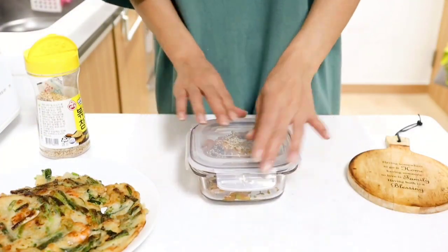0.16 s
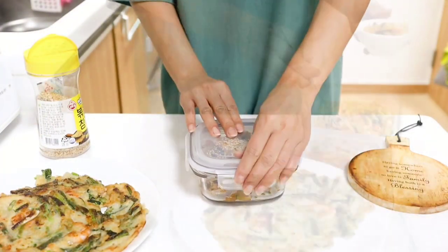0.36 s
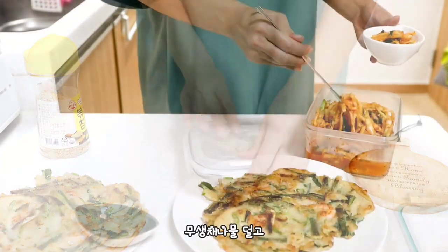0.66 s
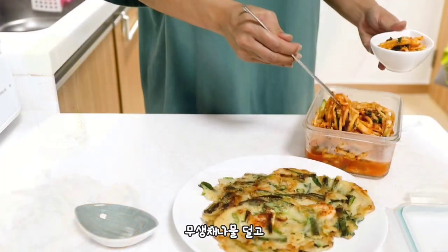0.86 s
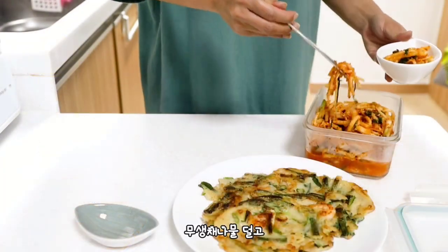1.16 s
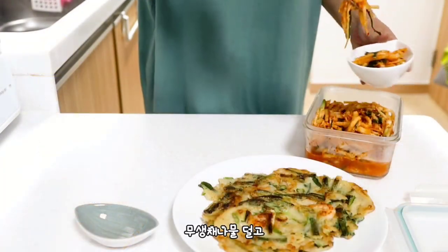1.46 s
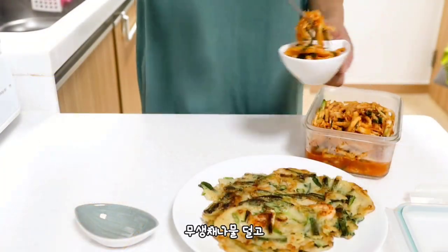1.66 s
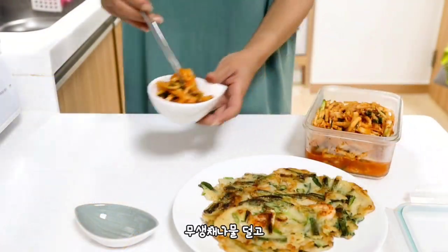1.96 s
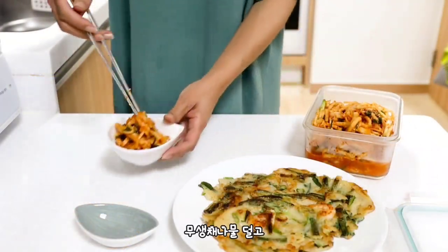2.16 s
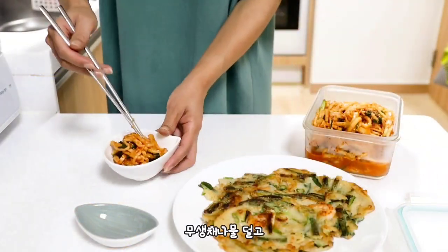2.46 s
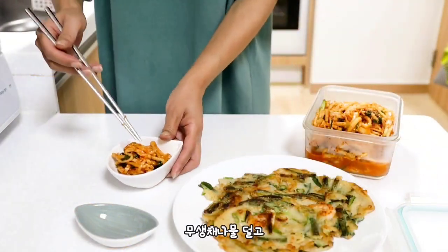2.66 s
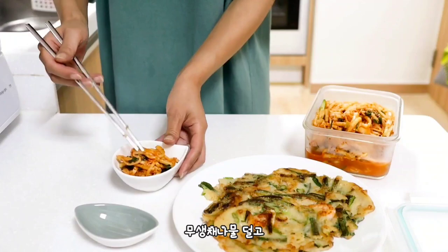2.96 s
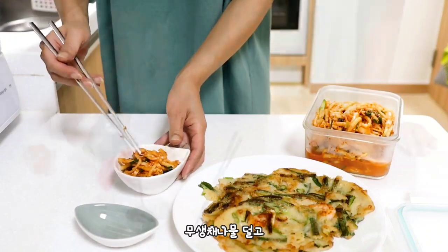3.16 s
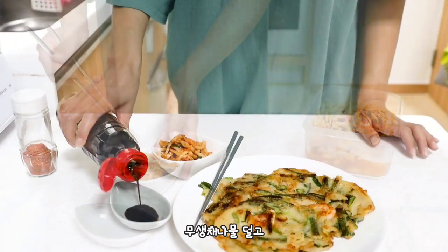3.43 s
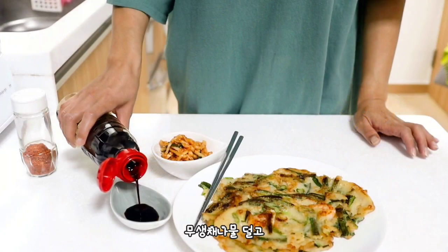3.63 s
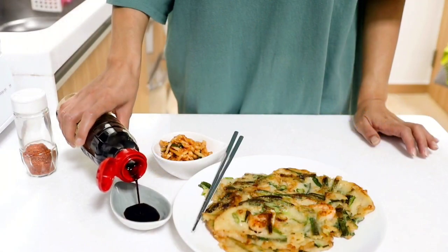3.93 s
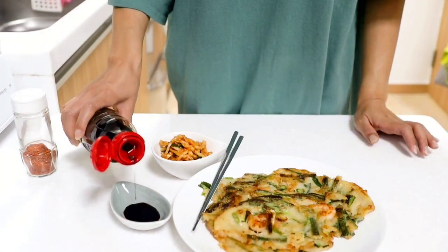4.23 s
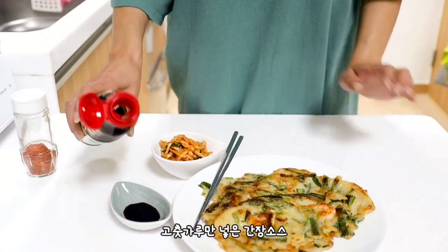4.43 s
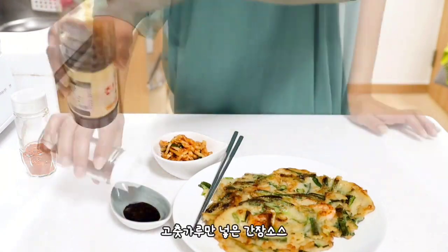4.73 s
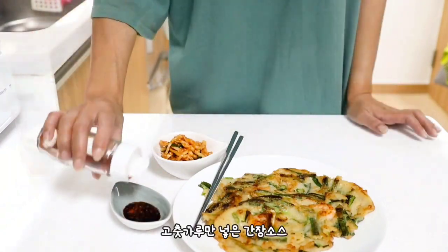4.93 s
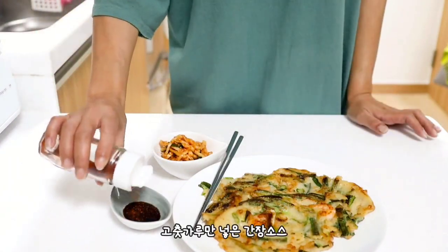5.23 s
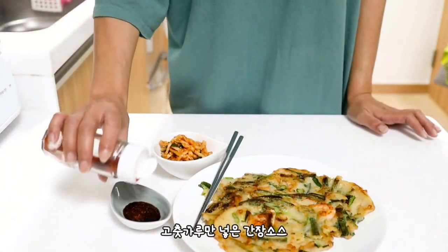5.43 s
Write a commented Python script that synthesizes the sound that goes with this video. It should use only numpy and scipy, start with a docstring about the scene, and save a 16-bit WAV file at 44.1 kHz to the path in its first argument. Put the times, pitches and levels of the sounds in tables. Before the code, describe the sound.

In a home kitchen with appliances droning steadily, hands press a plastic lid onto a glass box and two flaps click shut loudly. A couple of seconds later tableware is set down with one firm knock and several lighter ones, then small things tick and clink quietly. The microphone is close, and the hard walls give each blow a brief ring.

```python
"""Plastic lid and tableware in a kitchen

The flaps of a plastic lid snap shut on a glass box, then tableware knocks on the table and small
things tick. Each blow rings damped modes and hard walls answer it; appliances drone and hum behind.
The camera widens the treble in stereo and meets the loudest blows with clipping and a brief gain dip."""
import sys
import numpy as np
from scipy import signal
from scipy.fft import rfft, irfft, next_fast_len
from scipy.io import wavfile
from scipy.ndimage import uniform_filter1d, map_coordinates

SR = 44100
rng = np.random.default_rng(int(sys.argv[2]) if len(sys.argv) > 2 else 0)


def output_pcm(signal):
    """Save a mono or channel-first signal as 16-bit PCM at the path in sys.argv[1].

    Samples are clipped to [-1, 1] before scaling.
    """
    pcm = np.clip(np.atleast_2d(signal).T, -1, 1) * 32767
    wavfile.write(sys.argv[1], SR, np.round(pcm).astype(np.int16))


N = 246519
LEAD = SR // 10  # samples before time 0
HIT_TIME_S = np.arange(SR // 8) / SR

# Each row: frequency in Hz, t60 in seconds, level in dB for side flap, front flap, back flap, creak.
LID_MODES = [(300, 0.028, -22, -16, -26, -6), (560, 0.04, -20, -15, -26, -5),
             (800, 0.024, -10, -20, -9, -14), (900, 0.011, -33, -12, -13.5, -2.5),
             (1140, .014, -9, -22, -11, -7), (1400, 0.015, -21, -15, -13, -6.5),
             (1664, 0.0099, -4, -20, -5, -16), (1880, 0.011, 3, -24, 0, -8), (2420, 0.007, -5, -9, -1, -8),
             (2900, .005, -2, -9, -8, -16.5), (3205, 0.0055, -8, -6, -7, -12.5),
             (3830, .006, -10, 0, -14, -20), (4083, 0.007, -1, -9, 2, -20), (4850, .0045, -6, 5, -3, -25),
             (5200, 0.0055, 1.5, -16, 2, -28.5), (5600, .004, -8, 1, -14, -30),
             (6480, 0.004, -8, 1, 1, -33), (7200, .0034, -7, 6.5, -4, -33), (8900, 0.0046, 0, -14, 0, -35),
             (9800, .0035, -9.5, -22, -2, -33), (11100, .004, -12, -2, -10, -36),
             (12900, 0.0033, -12, -24, -4, -38.5), (14700, .003, -12, -2, -3, -40)]
SIDE_FLAP, FRONT_FLAP, BACK_FLAP, CREAK = 2, 3, 4, 5  # columns of LID_MODES
# Each row: start in seconds, level in dB, room in dB, extra room in the beamed band in dB.
FLAP_SNAPS = [(-.03, -1.5, -6.5, -.5), (0.4351, 0.4, -15, 5), (0.5129, 3, -10, -2)]
# Each row: start in seconds, level in dB, contact sharpness in Hz.
LID_CREAKS = [(0.3825, -26, 9000), (0.395, -22.5, 7000), (0.4235, -17, 5000), (.4262, -19, 3500),
              (0.4903, -18, 3000)]


def lid():
    """Each flap drives the lid's modes from its own place; creaks bend it and stir the low modes."""
    out = np.zeros((2, N + LEAD))
    shared = dict(echo_s=0.0137, echo_db=-21, thin_hz=350)
    for flap, (start, db, room_db, beam_db) in zip((SIDE_FLAP, FRONT_FLAP, BACK_FLAP), FLAP_SNAPS):
        snap = blow(LID_MODES, flap, sharp_hz=12000, room_db=room_db, crack_db=-10,
                    attack_s=0.00028, blur_octaves=0.11, beam_db=beam_db, **shared)
        add(out, start, amp(db) * snap)
    for start, db, sharp_hz in LID_CREAKS:
        creak = blow(LID_MODES, CREAK, sharp_hz, room_db=-5, crack_db=-22,
                     attack_s=0.0003, blur_octaves=0.2, **shared)
        add(out, start, amp(db) * creak)
    return out


# Each row: frequency in Hz, t60 in seconds, level in dB for a hard, a soft, a light knock.
WARE_MODES = [(103, 0.085, -22, -46, -40), (203, 0.045, -12, -20, -20), (260, 0.058, -15, -16, -13),
              (461, 0.025, -12, -11, -18), (588, 0.032, -16, -17, -8), (725, 0.034, -11, -3.5, -24),
              (755, .026, -18, -22, -1), (860, 0.026, -8, -10, -15), (965, 0.028, -6, -12, -20),
              (1125, 0.051, -7, -20, -20), (1310, 0.027, -12, -11, -8), (1580, 0.016, -3, -7, -13),
              (1810, 0.02, -4, -8, -12), (1950, 0.016, -2, -11, -11), (2170, 0.013, 6.5, -22, -2),
              (2200, .022, -24, -4, -24), (2600, 0.01, 2, -12, -14), (2710, .015, -22, -7, -20),
              (2860, 0.03, -19.5, -28, -24), (3120, .012, -9, -13, -12), (3330, 0.017, -15, -30, -18),
              (3570, .01, -17, -19, -24), (4300, 0.0061, -11, -34, -26), (4870, .02, -30, -30, -30)]
WARE_COLUMN = {"hard": 2, "soft": 3, "light": 4}  # kind of knock to its column of WARE_MODES
# Each kind: room in dB, crack in dB, attack in seconds, blur in octaves, extra beamed-band room in dB.
WARE_CONTACTS = {"hard": (-9.5, -46, 0.0004, .1, -1.5), "soft": (-7, -34, 0.0008, .08, -1),
                 "light": (-9, -34, .0007, .08, -1)}
# Each row: start in seconds, level in dB, contact sharpness in Hz, kind.
WARE_KNOCKS = [(2.6508, 4, 6500, "hard"), (2.683, -17, 2500, "soft"), (2.695, -11, 2500, "soft"),
               (2.7102, -12, 2500, "soft"), (3.064, -29, 3500, "soft"), (3.1163, -17, 1400, "soft"),
               (3.1210, -8.5, 5800, "soft"), (3.1238, -12, 5000, "soft"), (3.1265, -16, 4000, "soft"),
               (3.1315, -13, 2800, "soft"), (3.3423, -21, 1500, "light"), (3.3472, -24, 5000, "light"),
               (3.3485, -12, 4450, "light"), (3.3558, -20, 2500, "light")]


def tableware():
    """Dishes and table top ring together: one hard knock, then softer knocks and bounces."""
    out = np.zeros((2, N + LEAD))
    for start, db, sharp_hz, kind in WARE_KNOCKS:
        knock = blow(WARE_MODES, WARE_COLUMN[kind], sharp_hz, *WARE_CONTACTS[kind],
                     echo_s=0.017, echo_db=-28.5, thin_hz=40)
        add(out, start, amp(db) * knock)
    return out


def blow(modes, column, sharp_hz, room_db, crack_db, attack_s, blur_octaves, beam_db=0, *,
         echo_s, echo_db, thin_hz):
    """Modes ring under a short crack, heard directly, off the nearest wall and through the room."""
    t = HIT_TIME_S
    hz, t60, mode_db = np.array(modes).T[[0, 1, column], :, None]
    sign = (-1.0) ** np.arange(len(hz))[:, None]  # neighbouring modes start in opposite directions
    side_phase = rng.uniform(0, 2 * np.pi, hz.shape)
    mode_db = mode_db + rng.normal(0, 1.5, hz.shape)
    envelope = sign * amp(mode_db - 60 * t / t60) * (1 - np.exp(-t / attack_s))
    ring = np.array([(envelope * np.sin(2 * np.pi * hz * t + p)).sum(axis=0) for p in (0, side_phase)])
    crack = amp(crack_db - 60 * t / 0.016) * rng.standard_normal(ring.shape)
    # A small object loses the bass, a soft contact the treble.
    hit = filtered(ring + crack, lambda f: (1j * f / (thin_hz + 1j * f) / (1 + 1j * f / sharp_hz)) ** 2)
    beam_hz, beam_octaves = 1950, 0.3  # directional band: reaches walls and camera unequally
    beam = lambda f: amp(beam_db * np.exp(-0.5 * (np.log2((f + 1) / beam_hz) / beam_octaves) ** 2))
    radiated = all_round(filtered(hit, beam), blur_octaves)
    out = amp(room_db) * walls(radiated, fill_s=0.009)
    direct = widened(hit, DIRECT_WIDTH)
    out[:, :len(t)] += direct
    out[:, round(echo_s * SR):][:, :len(t)] += amp(echo_db) * direct
    return out


# Each row: start in seconds, level in dB, pitch in Hz, t60 in seconds.
PALM_THUMPS = [(.301, -21, 168, 0.042), (0.323, -18.5, 105, 0.043), (4.788, -28, 285, 0.088)]


def thumps():
    """Palms push softly on the table, ringing one low mode each time."""
    out, t = np.zeros((2, N + LEAD)), HIT_TIME_S
    for start, db, hz, t60 in PALM_THUMPS:
        push = amp(db - 60 * t / t60) * (1 - np.exp(-t / 0.0038)) * np.sin(2 * np.pi * hz * t)
        add(out, start, push * amp([[0], [-15]]))
    return out


# Each row: start in seconds, level in dB, centre in Hz, t60 in seconds, noise share from 0 to 1.
SMALL_TICKS = [(1.548, -44, 11500, 0.01, .8), (1.788, -32, 9800, .006, .5), (1.885, -42, 12500, .006, .8),
               (4.291, -38, 9900, 0.016, 0.6), (4.398, -33, 4800, 0.011, 0.75),
               (4.398, -36, 2900, .014, .6), (4.398, -39, 7000, .009, .7), (4.418, -42, 2600, .008, .8),
               (4.434, -42, 4200, .008, .5), (4.4345, -45, 7300, .01, .5), (4.398, -40, 10000, .01, .5),
               (4.425, -42, 4400, 0.016, .1), (4.4345, -36, 3100, 0.02, 0.2), (4.4365, -37, 2600, .03, .2),
               (4.6235, -27, 1890, 0.04, .25), (4.6245, -37, 2800, .02, .2),
               (4.6245, -35, 5500, 0.018, 0.7), (4.645, -34, 3900, 0.024, 0.15),
               (4.789, -42, 4500, .014, 0.8), (4.789, -44, 10500, .014, .8),
               (4.826, -38, 10800, 0.014, 0.8), (4.826, -42, 7600, .012, .6)]


def ticks():
    """Small things tick and clink: one short mode mixed with a broad click around it."""
    hits, t = np.zeros((2, N + LEAD)), HIT_TIME_S
    sag_share, sag_s = 0.05, 0.004  # the pitch starts high and settles
    for start, db, hz, t60, noise_share in SMALL_TICKS:
        band = lambda f: 1 / (1 + 1.4j * (f / hz - hz / (f + 1))) ** 2
        click = unit(filtered(rng.standard_normal((2, len(t))), band))
        cycles = hz * (t + sag_share * sag_s * (1 - np.exp(-t / sag_s)))
        tone = np.sin(2 * np.pi * cycles + rng.uniform(0, 2 * np.pi, (2, 1)))
        envelope = amp(db - 60 * t / t60) * (1 - np.exp(-t / 0.0007))
        add(hits, start, envelope * (noise_share * click + (1 - noise_share) * tone))
    return widened(hits, DIRECT_WIDTH) + amp(-15) * walls(hits[0], fill_s=0.006)[:, :N + LEAD]


# Drone and hiss as heard, sinking for a moment after the loud blows.
# Each row: time in seconds, drone in dB, hiss in dB.
BACKGROUND_LEVELS = [(0, -42.5, -59.5), (.8, -41, -59), (1.3, -38.5, -58.5), (2.6, -39.5, -58),
                     (3.3, -41.5, -61.5), (4.15, -38, -58), (4.75, -42.5, -57.5), (5.2, -38.5, -57.5),
                     (5.59, -39, -59)]
# Each row of both spectra: frequency in Hz, relative density in dB.
DRONE_SPECTRUM = [(12, -35), (25, -15), (54, -4), (108, -13), (190, -6.5), (400, -9), (540, -11.5),
                  (660, -7.5), (780, -15), (990, -12), (1140, -17.5), (1350, -15.5), (1730, -22),
                  (5000, -42.5), (6500, -64.5), (11000, -120)]
HISS_SPECTRUM = [(1180, -24), (2000, -2.5), (2600, -8.5), (3100, -10), (5400, -12), (6500, -14),
                 (9200, -19.5), (11400, -15.5), (12500, -17.5), (15200, -28), (16000, -55.5)]


def appliances():
    """A broad drone, a thin hiss and a wavering motor tone that sags in pitch as it swells."""
    t = np.arange(N) / SR
    times, *levels = np.transpose(BACKGROUND_LEVELS)
    drone_db, hiss_db = (np.interp(t, times, db) for db in levels)
    drone = amp(drone_db + 0.5 * wobble(4)) * rush(DRONE_SPECTRUM, patchy_db=0.8)
    hiss = amp(hiss_db + 0.8 * wobble(10)) * rush(HISS_SPECTRUM, patchy_db=1.7)
    hum_hz, hum_db = 162.8, -42.5
    period_s, first_top_s, swell_db, sag_hz = 2.34, 1.274, 2, 1.12
    swell = np.cos(2 * np.pi * (t - first_top_s) / period_s)
    phase = 2 * np.pi * np.cumsum(hum_hz - sag_hz * swell + 1.59 * wobble(18)) / SR
    hum = amp(hum_db + swell_db * swell + 1.8 * wobble(11)) * np.sin(phase)
    return drone + hiss + hum * amp([[0], [-16]])


def rush(spectrum, patchy_db):
    """Diffuse noise with random gain patches in time and frequency; mid rms 1."""
    bins = signal.stft(rng.standard_normal((2, N)), nperseg=512)[2]
    patches = uniform_filter1d(rng.standard_normal(bins.shape[1:]), size=5, axis=0)
    patches = unit(uniform_filter1d(patches, size=12, axis=1))
    pair = signal.istft(bins * amp(patchy_db * patches), nperseg=512)[1][:, :N]
    pair = filtered(pair, lambda hz: amp(along(spectrum, hz)))
    return widened(pair / np.std(pair[0]), DIFFUSE_WIDTH)


# Decay of the echo as heard; the treble above about 12 kHz cuts off quickly.
# Each row: frequency in Hz, t60 in seconds.
ECHO_DECAY = [(100, 0.88), (400, 0.65), (1000, 0.6), (2000, .47), (3000, 0.36), (4200, .42), (5500, .38),
              (7000, 0.42), (11200, 0.42), (12400, 0.12)]


def walls(hit, fill_s):
    """Echoes build up to fill the room; the tail as heard fades at its own rate in each band."""
    hz, t, bins = signal.stft(rng.standard_normal((2, SR * 3 // 5)), SR, nperseg=128)
    envelope = (1 - np.exp(-(t / fill_s) ** 2)) * amp(-60 * t / along(ECHO_DECAY, hz)[:, None])
    tail = signal.istft(bins * envelope, SR, nperseg=128)[1]
    tail /= np.linalg.norm(tail[0])
    return widened(signal.fftconvolve(hit[None], tail, axes=1), DIFFUSE_WIDTH)


def all_round(hit, blur_octaves):
    """A blow as the walls hear it from every side: peaks and notches average into one short pulse."""
    hz, octaves = np.fft.rfftfreq(hit.shape[1], 1 / SR), np.arange(0, 10.2, 1 / 50)
    grid_hz = 20 * 2 ** octaves
    power = np.interp(grid_hz, hz, np.mean(np.abs(rfft(hit)) ** 2, axis=0))
    blur = np.exp(-0.5 * ((octaves[:, None] - octaves) / blur_octaves) ** 2)
    smooth_power = np.interp(hz, grid_hz, blur @ power / blur.sum(axis=1))
    cepstrum = irfft(np.log(smooth_power + 1e-9) / 2)
    cepstrum *= np.repeat([2, 0], len(hz) - 1)  # minimum phase
    cepstrum[0] /= 2
    return irfft(np.exp(rfft(cepstrum)))


# Each row of both widths: frequency in Hz, side gain in dB.
DIRECT_WIDTH = [(100, -27), (400, -16), (1300, -6), (2400, -2), (4400, -4), (7000, -3), (10000, 4),
                (15000, -10)]
DIFFUSE_WIDTH = [(60, -21.5), (110, -13), (200, -11), (380, -7), (700, -5), (1290, 0.5), (2380, 4),
                 (4400, 6), (8120, 6.5), (15000, 7.5)]


def widened(pair, width):
    """Scales the side of a (mid, side) pair by the camera's stereo width."""
    return filtered(pair, lambda hz: np.array([np.ones_like(hz), amp(along(width, hz))]))


def amp(db):
    """dB to gain."""
    return 10 ** (np.asarray(db) / 20)


def unit(x):
    """Scales to rms 1."""
    return x / np.sqrt(np.mean(x ** 2) + 1e-20)


def along(points, hz):
    """Interpolates (Hz, value) points on a log axis."""
    point_hz, values = np.transpose(points)
    return np.interp(np.log(hz + 1), np.log(point_hz + 1), values)


def wobble(knots_per_s):
    """A smooth random curve."""
    return map_coordinates(rng.standard_normal(N // 1000), [np.arange(N) * knots_per_s / SR])


def filtered(x, response):
    """Applies a response given as a function of Hz."""
    size = next_fast_len(x.shape[-1] + 4096)
    return irfft(rfft(x, size) * response(np.fft.rfftfreq(size, 1 / SR)), size)[..., :x.shape[-1]]


def add(track, start_s, sound):
    """Mixes into a track that begins LEAD samples early."""
    part = track[:, LEAD + round(start_s * SR):][:, :sound.shape[1]]
    part += sound[:, :part.shape[1]]


def scene():
    """Mid and side become left and right; dishes stand a little left, appliances a little right."""
    mid, side = (lid() + thumps() + ticks())[:, LEAD:]
    dish_mid, dish_side = tableware()[:, LEAD:]
    far_mid, far_side = appliances()
    mid = mid + dish_mid + far_mid
    side = side + dish_side + 0.052 * dish_mid + far_side - 0.1 * far_mid
    return np.array([mid + side, mid - side])


def ducked(x, threshold_db=-9, share=0.45, attack_s=0.006, release_db_per_s=60):
    """Gain control, too slow for the blow itself: dips just after a peak and recovers steadily."""
    peak_db = 20 * np.log10(np.abs(x).max(axis=0) + 1e-9)
    over_db = np.maximum(peak_db - threshold_db, 0)
    climb_db = release_db_per_s * np.arange(N) / SR
    dip_db = np.maximum.accumulate(share * over_db + climb_db) - climb_db
    pole = np.exp(-1 / (attack_s * SR))
    return x * amp(-signal.lfilter([1 - pole], [1, -pole], dip_db))


# Each row: frequency in Hz, gain in dB.
MIC_RESPONSE = [(20, 1.5), (11500, 0), (13000, -8.5), (16000, -17)]


def record(dry):
    """The microphone dulls the top octave; loud blows saturate and duck; a steep low-pass follows."""
    top_hz = 16200
    heard = filtered(dry, lambda hz: amp(along(MIC_RESPONSE, hz)))
    clipped = heard / (1 + np.abs(heard) ** 16) ** (1 / 16)
    return filtered(ducked(clipped), lambda hz: 1 / (1 + (hz / top_hz) ** 120))


dry = scene()
out = record(dry)
output_pcm(out)
```